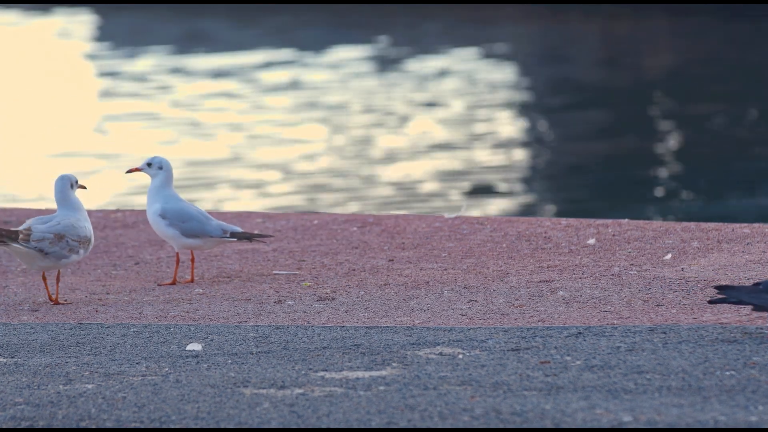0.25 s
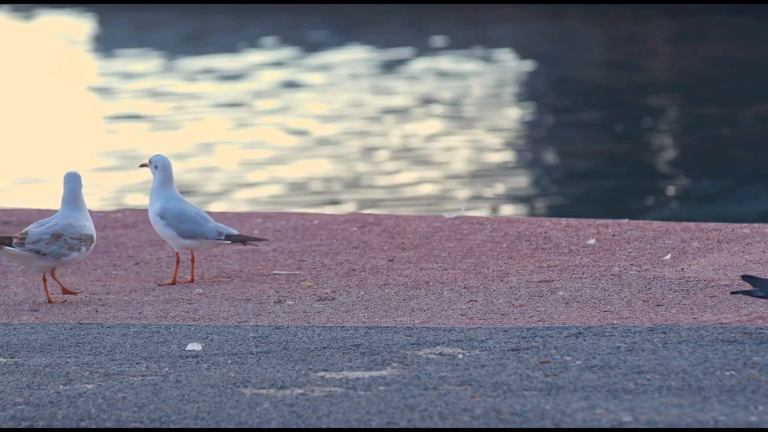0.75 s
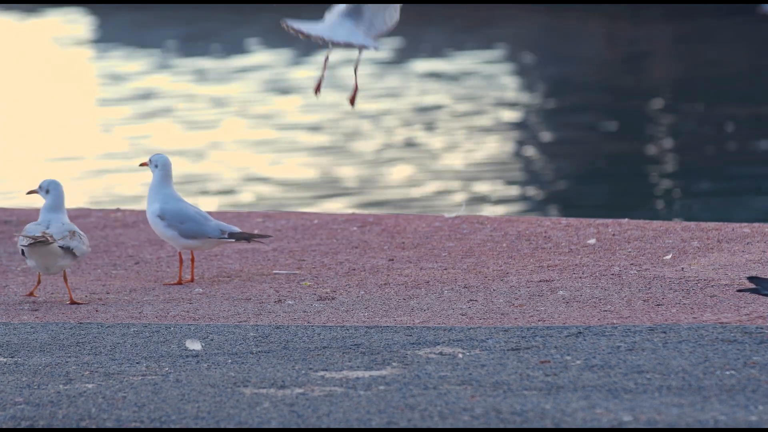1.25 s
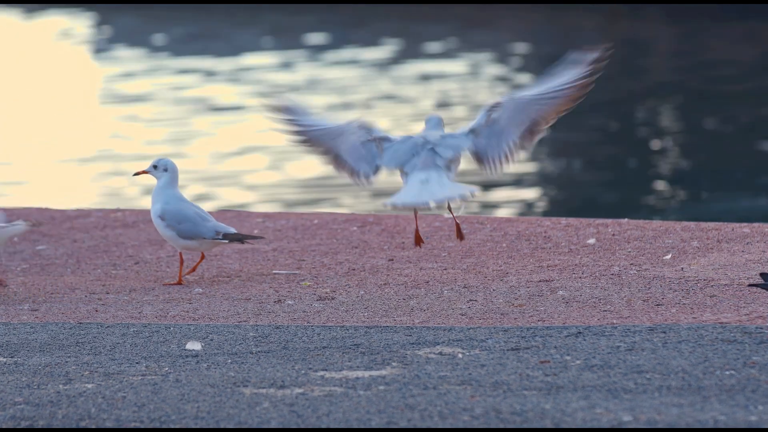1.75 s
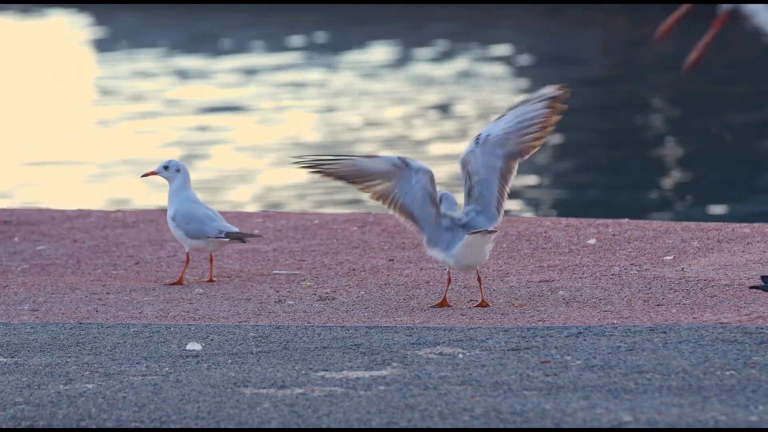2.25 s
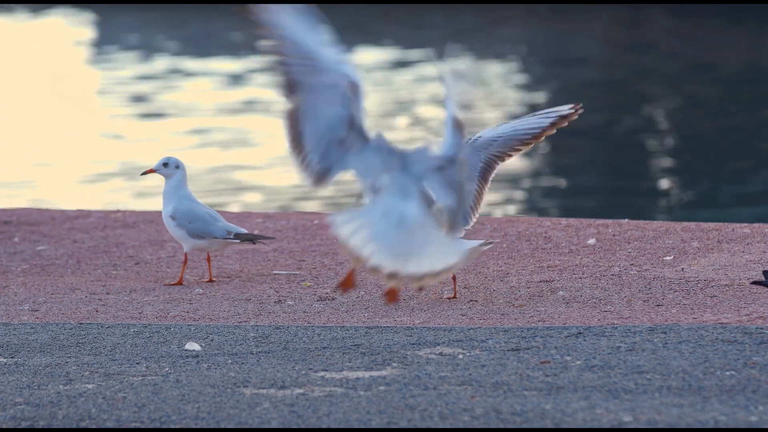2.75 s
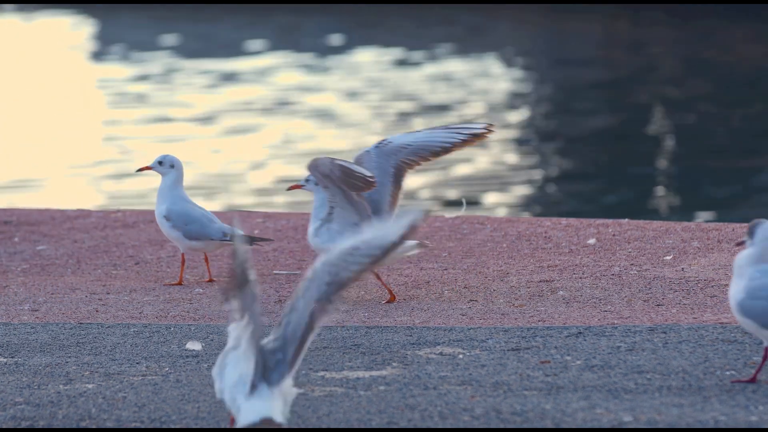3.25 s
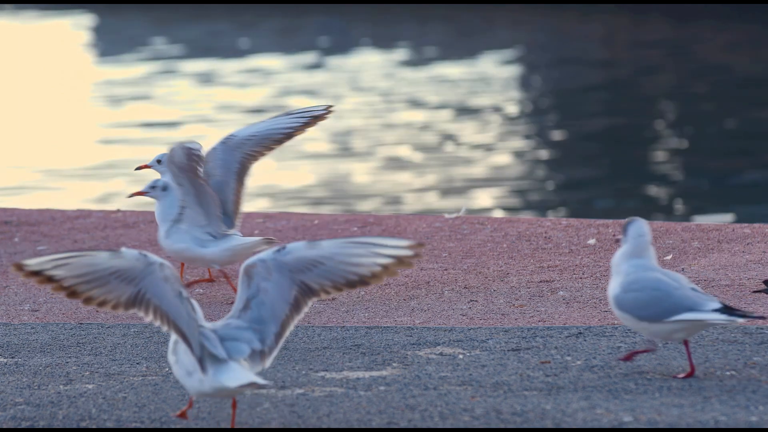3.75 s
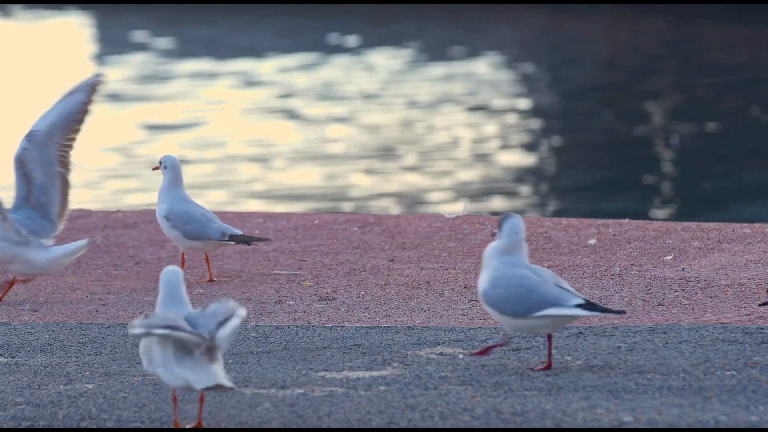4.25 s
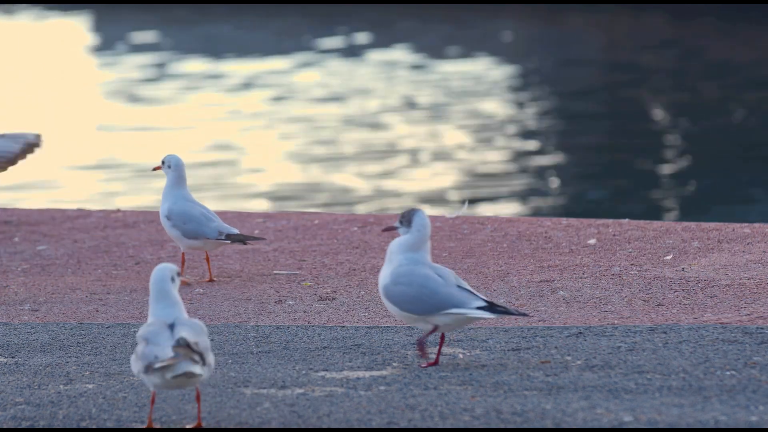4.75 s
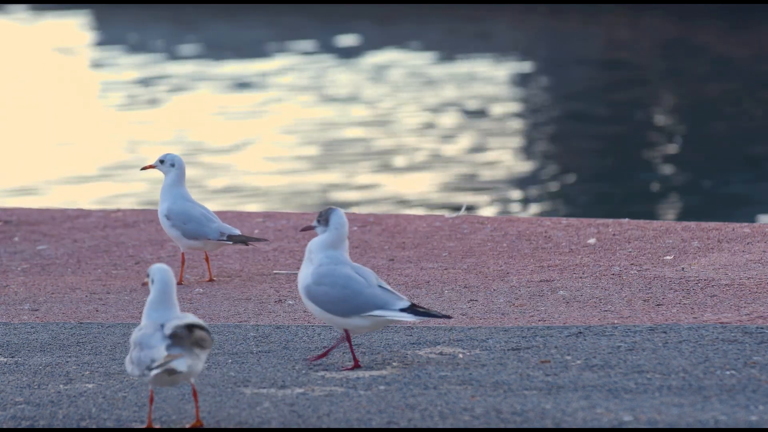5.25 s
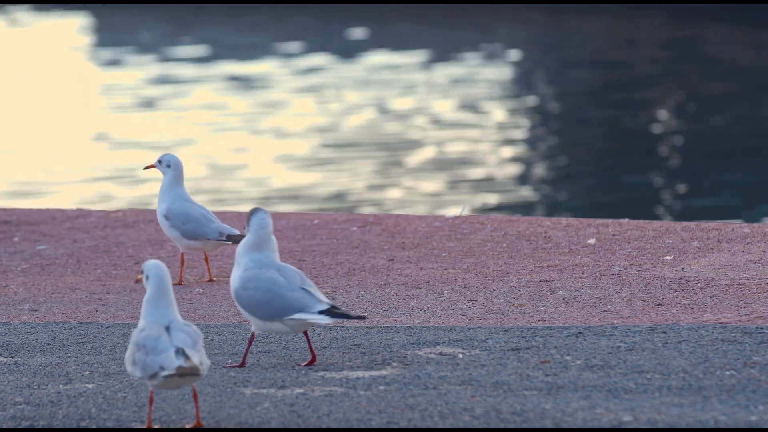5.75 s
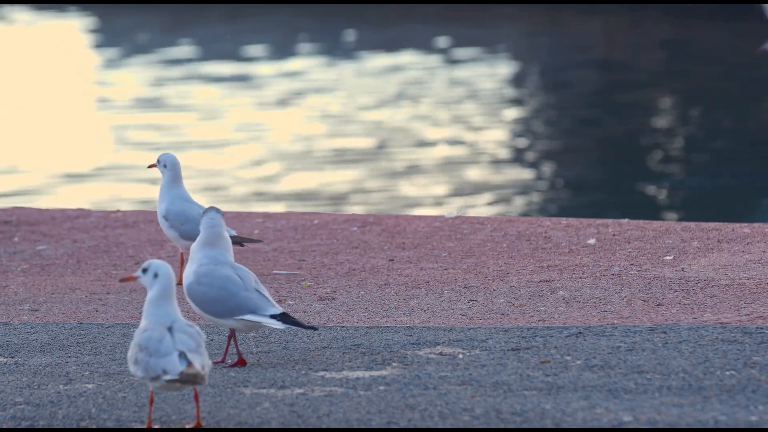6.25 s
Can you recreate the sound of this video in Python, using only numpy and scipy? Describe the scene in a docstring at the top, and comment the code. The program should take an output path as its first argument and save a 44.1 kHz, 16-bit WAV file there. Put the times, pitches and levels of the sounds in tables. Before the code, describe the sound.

At a harbour quay, gentle water laps with fizzing foam, droplets and a couple of bubbly plops above a soft, steady rumble. In the first half a gull close to the microphone yelps four times, much louder than the water, its raspy calls echoing briefly. The second half is quieter, with two faint distant peeps, a few low slaps of water and another small wash.

```python
"""Gull over a harbour quay

A gull gives four short yelps. Its voice arches up and down through a throat that favours fixed pitches,
clear at the top and hoarse at both ends, and echoes off the walls. Small waves slosh, fizz, drip and
slap at the quay over a low rumble, and two faint peeps come from far off."""
import sys
import numpy as np
from scipy import signal
from scipy.fft import rfft, irfft, next_fast_len
from scipy.io import wavfile
from scipy.ndimage import uniform_filter1d

SR = 44100
rng = np.random.default_rng(int(sys.argv[2]) if len(sys.argv) > 2 else 0)


def wav_record(signal):
    """Record a signal, one row per channel, as 16-bit PCM in the file named by sys.argv[1]."""
    frames = np.transpose(np.atleast_2d(signal))
    bounded = np.clip(frames, -1, 1)
    # unit amplitude maps onto the largest positive 16-bit level
    quanta = np.round(bounded * 32767).astype(np.int16)
    wavfile.write(sys.argv[1], SR, quanta)


N = 286209

# how a yelp fades in: (time from when the voice turns clear [s], level against that moment [dB])
FADE_IN = [(-.045, -27), (-.03, -17), (-.009, -11), (0, 0)]
# how a yelp dies away: (time after its hoarse tail [s], level against the tail [dB])
FADE_OUT = [(.016, -5), (.03, -18), (.05, -21)]
# how alike left and right are in the slosh and rumble: (frequency [Hz], likeness [0-1])
LIKENESS = [(30, .15), (60, .4), (130, .65), (290, .78), (630, .82), (1370, .75), (3000, .6), (6500, .25),
            (14000, .1)]


def gull():
    """Four yelps and their echo, gently squeezed where they are loudest."""
    # (turns clear at [s], climb [s], fall [s], swell ends [s], hold ends [s], tail ends [s],
    #  top pitch [Hz], level on clearing [dB], loud level [dB], tail level [dB],
    #  boost of the lowest tone [dB], voice crack [dB]); the three ends count from turning clear
    yelps = [(.655, .036, .118, .068, .09, .165, 714, -11.5, -2, -10.5, 0, 13),
             (1.28, .021, .13, .035, .078, .143, 698, -8, -3, -14, -1.5, 0),
             (1.878, .033, .123, .03, .082, .147, 702, -9, -3, -15.5, 10, 0),
             (2.448, .034, .112, .05, .072, .15, 692, -7.5, -3.5, -16, 10, 0)]
    calls = np.zeros(N)
    for s, *settings in yelps:
        voice = yelp(*settings)
        start = int((s + FADE_IN[0][0]) * SR)
        calls[start:start + len(voice)] += voice
    sound = calls + wall_echo(calls)
    loudness = abs(signal.hilbert(sound, next_fast_len(N)))[:N]
    ceiling = .89
    squeezed = sound / (1 + (loudness / ceiling) ** 8) ** (1 / 8)
    buzz = undb(-18.5) * loudness ** 3 * squeezed ** 7  # the loudest parts buzz at three times their pitch
    return low_pass(squeezed + buzz, hz=4300)


def yelp(climb, fall, swell, hold, tail, top_hz, clear_db, loud_db, tail_db, lowest_db, crack_db):
    """A pulsing voice swells, breaks into a hoarse tail and sounds through the throat and open bill."""
    # how strongly the throat and bill pass each pitch: (frequency [Hz], gain [dB])
    throat = [(400, -48.5), (650, -31.5), (880, -27.5), (1050, -6.5), (1300, 6), (1550, -0.5),
              (1800, -14.5), (2100, -15.5), (2500, -34.5), (2900, -29), (3500, -33.5), (3850, -38),
              (4200, -42.5)]
    # the voice catches twice as it slips down: (time after the hold [s], depth [0-1], length [s])
    catches = [(.007, .4, .003), (.024, .62, .0035)]
    t = np.arange(FADE_IN[0][0], tail + FADE_OUT[-1][0], 1 / SR)
    hz = pitch_arch(t, climb, fall, top_hz)
    levels = [(s, clear_db + db) for s, db in FADE_IN]
    levels += [(swell, loud_db - 1), (hold, loud_db), (hold + .027, tail_db), (tail, tail_db)]
    levels += [(tail + s, tail_db + db) for s, db in FADE_OUT]
    harmonics = np.arange(1, 11)[:, None]  # tones at 1 to 10 times the pitch
    pulses = voice_pulses(t - hold, hz, harmonics, lowest_db, crack_db)
    throat_gain = np.sqrt(np.sum(undb(2 * curve_by_octave(throat, harmonics * hz)), axis=0) / 2)
    pulses *= undb(curve(levels, t)) / throat_gain  # evens out the throat's effect on loudness
    for s, depth, length in catches:
        pulses *= 1 - depth * np.exp(-((t - hold - s) / length) ** 2)
    pulses *= np.clip(np.minimum(t - t[0], t[-1] - t) / .012, 0, 1)  # no click at either end
    colour = undb(curve_by_octave(throat, np.fft.rfftfreq(len(t), 1 / SR)))
    return irfft(rfft(pulses) * colour, len(t))


def pitch_arch(t, climb, fall, top_hz):
    """The pitch climbs from rest to its top and falls back; the muscles round off every turn."""
    rest_hz, head_start_s = 436, .034
    to_climb = np.clip((climb - t) / (climb + head_start_s), 0, 1)
    fallen = np.clip((t - climb) / fall, 0, 1)
    hz = top_hz - (top_hz - rest_hz) * (to_climb ** 1.8 + fallen ** 1.33)
    return uniform_filter1d(hz, size=600)


def voice_pulses(since_hold, hz, harmonics, lowest_db, crack_db):
    """The voice's pulses shake in pitch and size when hoarse; a crack flares the top harmonics."""
    size, crack_s = len(hz), .018
    hoarse = hoarseness(since_hold, crack_db)
    shake = wander(500, size)
    shake -= uniform_filter1d(shake, size=700)  # cycles vary, the average pitch holds
    flutter = .012 * np.sin(2 * np.pi * 90 * yelp_clock(size))
    jitter = .2 * hoarse * shake + flutter
    phase = 2 * np.pi * np.cumsum(hz * (1 + jitter)) / SR
    # higher harmonics come from the sharp edge of each cycle and break up first
    unsteady = np.clip(.4 * hoarse + .17 * (harmonics - 1.9) * (harmonics > 2), .4 * hoarse, .85)
    ragged = np.array([wander(120 * k, size) for k in harmonics.flat])
    strength = np.sqrt(1 - unsteady ** 2) + unsteady * ragged
    strength[0] *= undb(lowest_db)
    strength[5:] *= undb(crack_db * np.exp(-((since_hold + crack_s / 2) / crack_s) ** 2))
    return (strength * np.cos(harmonics * phase)).sum(axis=0)


def hoarseness(since_hold, crack_db):
    """The voice starts rough, clears, then turns rough again, more so after a crack."""
    # the rough start: (time from turning clear [s], hoarseness [0-1])
    rough_start = [(-.014, .8), (-.004, .07)]
    # the rough tail: (time from the end of the hold [s], hoarseness [0-1])
    rough_tail = [(-.033, .09), (0, .11), (.03, .32), (.07, .48)]
    t = yelp_clock(len(since_hold))
    hold = t[0] - since_hold[0]
    ending = [(hold + s, rough + .011 * crack_db * (s >= 0)) for s, rough in rough_tail]
    return curve(rough_start + ending, t)


def yelp_clock(size):
    """Seconds through a yelp, with zero where the voice turns clear."""
    return FADE_IN[0][0] + np.arange(size) / SR


def wall_echo(sound):
    """The harbour walls answer quickly; a fainter, longer echo returns from across the basin."""
    t = np.arange(SR) / SR
    fade = die_away(t, ring_s=.21) + undb(-21.5) * die_away(t, ring_s=1.23)
    echo = rng.standard_normal(SR) * fade * (t > .01)
    return undb(-12.5) * signal.fftconvolve(sound, echo / np.linalg.norm(echo))[:N]


def waves():
    """Each small wave builds to its crest and drains away, driving foam, slosh and droplets."""
    # (crest time [s], fizz [dB], spray over fizz [dB], slosh [dB], left minus right [dB],
    #  time to gain the last 10 dB [s], time to lose the first 10 dB [s])
    wavelets = [(.3, -52, -5, -38.5, -9, .4, .3), (.9, -53, 20, -39, -1, .015, .5),
                (1.05, -43, 21, -33, -1, .09, .45), (1.31, -39, 15, -25, -1, .2, .28),
                (1.56, -47, 18, -31, -1, .15, .2), (1.86, -57, 0, -33, 0, .2, .3),
                (2.37, -44, 18, -35, -5, .035, .03), (2.5, -53, 15, -36, -5, .3, .3),
                (2.74, -55, 21, -35, -7, .2, .45), (3.4, -56, 18, -43, -11, .02, .6),
                (3.66, -60, 21, -33, -12, .35, .25), (4.15, -56, -8, -42, -12, .5, .9),
                (5.5, -56, 13, -40, 3, .1, .4), (5.9, -44.5, 14, -28.5, 2, .38, .3),
                (6.11, -49, 13, -31, 0, .15, .2), (6.42, -51, 16, -35, -6, .2, .4)]
    # calm water: (fizz [dB], spray over fizz [dB], slosh [dB], left minus right [dB])
    calm = (-63, -10, -47, -12)
    t = np.arange(N) / SR
    swells = [(np.ones(N), *calm)]
    for crest, *levels, build, drain in wavelets:
        swells.append((undb(-10 * np.maximum((crest - t) / build, (t - crest) / drain)), *levels))
    fizz_power, spray_power, slosh_power = 0, 0, 0
    for swell, fizz_db, spray_db, slosh_db, pan_db in swells:
        sides = (swell * undb(fizz_db + np.array([[pan_db], [-pan_db]]) / 2)) ** 2
        fizz_power += sides
        spray_power += sides * undb(2 * spray_db)
        slosh_power += (swell * undb(slosh_db)) ** 2
    return foam(fizz_power, spray_power) + slosh(slosh_power) + droplets(fizz_power)


def foam(fizz_power, spray_power):
    """Tiny bubbles burst in clusters: a coarse fizz with fine spray above it."""
    # tone colour of the foam: (frequency [Hz], level [dB])
    colour = [(1180, -33), (2000, 4), (2140, -1), (4500, -9), (7120, -19), (11600, -25), (13800, -34),
              (14700, -37.5)]
    # how alike its left and right are: (frequency [Hz], likeness [0-1])
    likeness = [(1000, .93), (3500, .95), (5000, .8), (7000, .65), (10000, .72), (13000, .55)]
    fizz, spray = split(stereo_noise(colour, likeness, crackle_db=2, flicker_db=1.4, flicker_hz=16), 7000)
    clusters = undb(1.1 * wander(18))
    return clusters * (np.sqrt(fizz_power) * fizz + np.sqrt(spray_power) * spray)


def slosh(power):
    """Water washes against the quay with each wave."""
    # tone colour of the slosh: (frequency [Hz], level [dB])
    colour = [(210, -7), (350, -4), (390, -6.5), (441, -3), (1090, -3.5), (1390, -10.5), (2500, -29),
              (3250, -37.5), (5500, -120)]
    return np.sqrt(power) * stereo_noise(colour, LIKENESS, crackle_db=1.75, flicker_db=1.9, flicker_hz=7.8)


def droplets(fizz_power):
    """Each droplet is a short ping; a few stand out from a shower whose level follows the fizz."""
    # the clear drops: (time [s], level [dB], pitch [Hz], left minus right [dB], length [cycles])
    clear_drops = [(.9196, -29, 3130, -4, 3.4), (.9789, -27, 3924, 1, 4), (.9879, -30, 8550, 2.5, 4.7),
                   (1.0313, -32, 3013, -1, 4), (1.8624, -33, 3180, 0, 3.6), (2.1782, -29, 7150, .5, 1.7),
                   (2.2361, -36, 4490, -2, 4), (2.3538, -31, 3430, -6, 3.5), (2.3718, -23.5, 4260, -6, 3.5),
                   (2.3718, -27, 6890, -3, 3), (2.4386, -33, 7190, .5, 3.6), (2.9045, -34, 3150, -5, 4.6),
                   (3.09, -38, 5600, -7, 3), (3.25, -38, 5800, -7, 3), (3.3984, -33, 6900, -7, 2.5),
                   (3.6299, -34, 5520, -7, 4), (5.7551, -34, 3100, 4, 4), (5.8179, -33, 3380, 4, 4),
                   (6.1008, -33, 9250, 2, 4), (6.1043, -24.5, 4650, 2.5, 4),
                   (6.2215, -29.5, 3670, 1.5, 5.8), (6.3846, -34, 4220, -4.5, 4)]
    drops_per_s = 160
    when, size, pitch, side, length = rng.random((int(drops_per_s * N / SR), 5)).T
    times = when * N / SR
    fizz_db = 10 * np.log10(fizz_power.mean(axis=0))
    levels = fizz_db[(times * SR).astype(int)] - 2.5 + 11 * size ** 2
    shower = zip(times, levels, 2200 * 5.5 ** pitch, 8 * (side - .5), 2 + 7.4 * length)
    out, t = np.zeros((2, N + SR)), np.arange(300) / SR
    for s, db, hz, pan_db, cycles in [*clear_drops, *shower]:
        age = t * hz / cycles
        outline = undb(db) * 3 * age * np.exp(1 - 3 * age)
        ping = outline * np.sin(2 * np.pi * hz * t * (1 + .03 * age))
        span = int(s * SR) + np.arange(len(t))
        out[0, span + 1] += undb(pan_db / 2) * ping  # left is one sample late
        out[1, span] += undb(-pan_db / 2) * ping
    return out[:, :N]


def bubbles():
    """Two bubbles ring, rising in pitch as they fade."""
    # (time [s], level [dB], pitch [Hz], ring time [s])
    plops = [(0.891, -19.5, 770, 0.074), (2.345, -15.5, 890, 0.031)]
    return ringing_tones(plops, glide=.51, rise_s=.0012)


def slaps():
    """Water slaps dully under the quay."""
    # (time [s], level [dB], pitch [Hz], ring time [s])
    thuds = [(4.788, -19.5, 62.6, 0.33), (4.905, -17, 136, 0.18), (5.261, -16, 78.1, 0.13)]
    return ringing_tones(thuds, glide=.044, rise_s=.006)


def far_peeps():
    """Two faint peeps from far off, roughened by moving air."""
    # (time [s], level [dB], pitch [Hz], ring time [s])
    peeps = [(4.1733, -35, 1840, 0.18), (4.2492, -38, 1770, 0.21)]
    return (1 + .6 * wander(120)) * ringing_tones(peeps, glide=.001, rise_s=.0035)


def rumble():
    """A low rumble whose bass drifts slowly in level under a soft hiss."""
    # tone colour of the rumble: (frequency [Hz], level [dB])
    colour = [(12, -41), (20, -17.5), (59, -10), (154, 0.5), (202, -1), (719, -24.5), (1120, -22.5),
              (1280, -30), (1740, -26.5), (2170, -42.5), (9080, -53), (12000, -56), (14500, -77)]
    # loudness of its bass: (time [s], level [dB])
    bass_levels = [(0, -31.5), (.8, -33), (1.3, -32), (1.9, -30.5), (2.5, -33.5), (3.3, -36), (4.6, -34),
                   (5.5, -34), (6.49, -36)]
    bass, hiss = split(stereo_noise(colour, LIKENESS, crackle_db=0, flicker_db=1.12, flicker_hz=1.9), 260)
    return undb(curve(bass_levels, np.arange(N) / SR)) * unit(bass) + undb(-25.5) * hiss


def stereo_noise(colour, likeness, crackle_db, flicker_db, flicker_hz):
    """Left and right noise of a given tone colour; each octave flickers on its own."""
    # which side is louder: (frequency [Hz], left minus right [dB])
    balance = [(60, 3.5), (110, 5), (200, 3), (370, 1), (680, 0.0), (1250, -2.5), (2300, 2), (4230, 2.5),
               (7770, 2), (14300, 2.5)]
    # the left side lags a little: (frequency [Hz], phase shift [radians])
    left_shift = [(100, -.3), (2000, -.3), (3200, -.1), (5500, -.7), (7000, -1.3), (10000, -1.8),
                  (14000, -2.4)]
    hz = np.fft.rfftfreq(N, 1 / SR)
    grains = undb(crackle_db * rng.exponential(size=(3, N // 8 + 1))).repeat(8, axis=1)[:, :N]
    both, left, right = rfft(grains * rng.standard_normal((3, N)))
    alike = curve_by_octave(likeness, hz)
    lean = undb(curve_by_octave(balance, hz) / 2)
    lag = np.exp(1j * curve(left_shift, hz))
    pair = np.array([(np.sqrt(alike) * both * lag + np.sqrt(1 - alike) * left) * lean,
                     (np.sqrt(alike) * both + np.sqrt(1 - alike) * right) / lean])
    low_hz, high_hz = colour[0][0], colour[-1][0]
    pair *= undb(curve_by_octave(colour, hz)) * (hz >= low_hz) * (hz <= high_hz)
    octave, out = np.log2(np.maximum(hz, 1)), 0
    for centre in range(int(np.log2(low_hz)), int(np.log2(high_hz)) + 2):
        band = pair * np.clip(1 - abs(octave - centre), 0, 1)
        out += irfft(band, N) * undb(flicker_db * wander(flicker_hz))
    return unit(out)


def ringing_tones(table, glide, rise_s):
    """Tones that start quickly and climb in pitch as they fade."""
    out, t = np.zeros(N), np.arange(SR // 2) / SR
    for s, db, hz, ring_s in table:
        tone = np.sin(2 * np.pi * hz * (t + glide * t ** 2 / ring_s))
        tone *= undb(db) * (1 - np.exp(-t / rise_s)) * die_away(t, ring_s)
        out[int(s * SR):int(s * SR) + len(t)] += tone
    return out


def die_away(t, ring_s):
    """A fade that loses 60 dB in ring_s."""
    return 1000 ** (-t / ring_s)


def wander(rate, size=N):
    """A smooth random wobble with about `rate` new values a second."""
    step = int(SR / rate)
    steps = np.repeat(rng.standard_normal(size // step + 1), step)
    return unit(uniform_filter1d(uniform_filter1d(steps, step), step)[:size])


def undb(db):
    """Turn decibels into a gain."""
    return 10 ** (np.asarray(db) / 20)


def unit(x):
    """Scale to an average power of 1."""
    return x / np.sqrt(np.mean(x ** 2))


def curve(table, x):
    """Join a table's points with straight lines."""
    return np.interp(x, *np.transpose(table))


def curve_by_octave(table, hz):
    """Join (frequency, value) points, with octaves evenly spaced."""
    points_hz, values = np.transpose(table)
    return np.interp(np.log(np.maximum(hz, 1)), np.log(points_hz), values)


def low_pass(x, hz):
    """Steeply cut everything above hz."""
    return signal.sosfilt(signal.ellip(8, .2, 60, hz, fs=SR, output="sos"), x)


def split(x, hz):
    """The parts of a sound below and above hz."""
    below = signal.sosfiltfilt(signal.butter(1, hz, fs=SR, output="sos"), x)
    return below, x - below


def scene():
    """The gull, the water and the background together."""
    return gull() + waves() + bubbles() + slaps() + far_peeps() + rumble()


def record(dry):
    """Clip peaks at full scale and cut the highest treble."""
    return low_pass(np.clip(dry, -1, 1), hz=14700)


dry = scene()
out = record(dry)
wav_record(out)
```